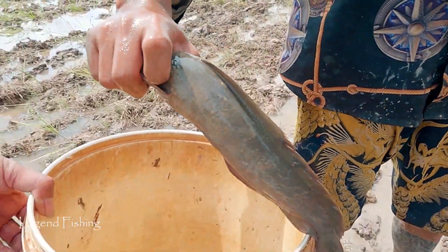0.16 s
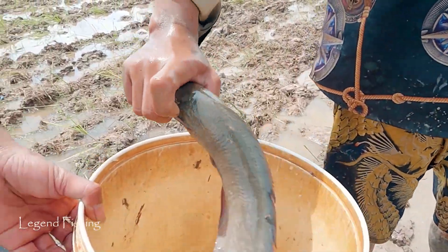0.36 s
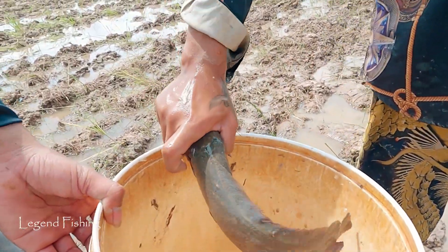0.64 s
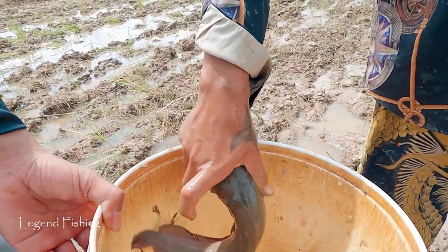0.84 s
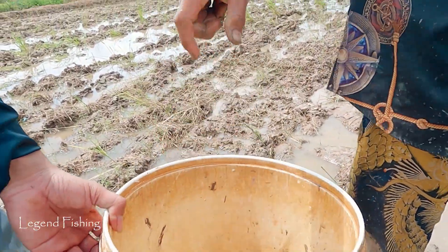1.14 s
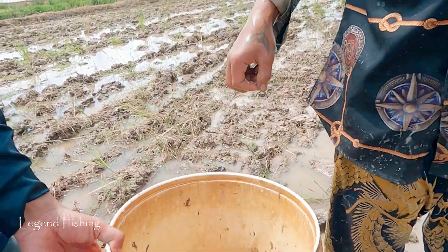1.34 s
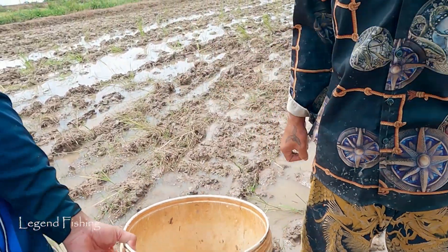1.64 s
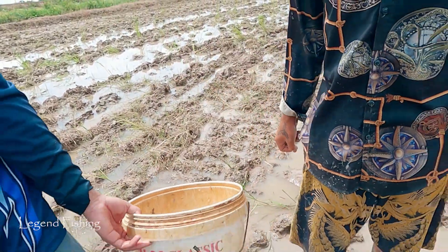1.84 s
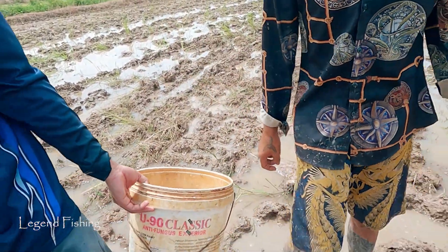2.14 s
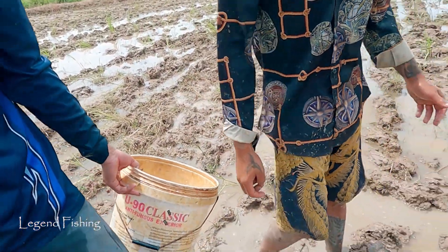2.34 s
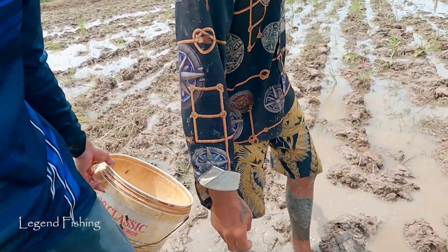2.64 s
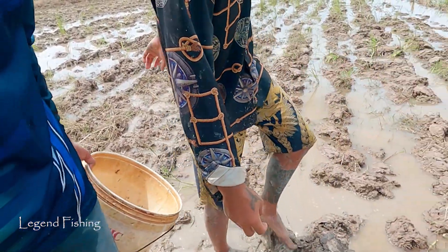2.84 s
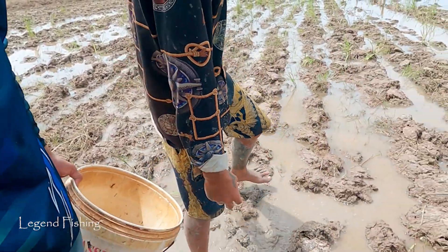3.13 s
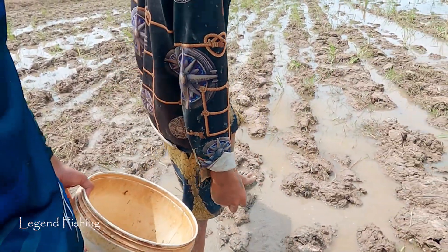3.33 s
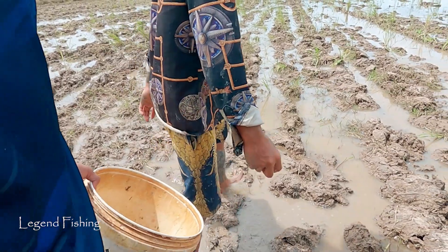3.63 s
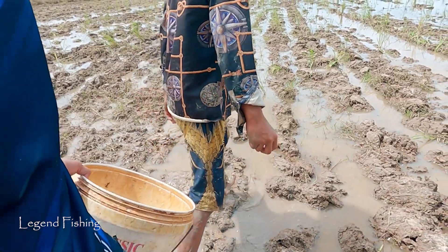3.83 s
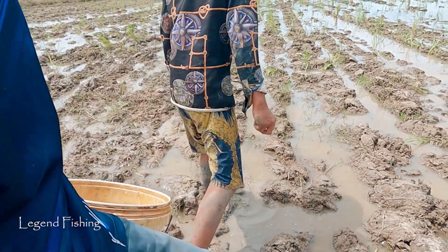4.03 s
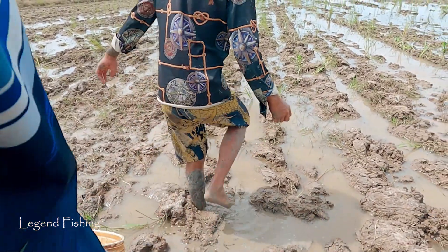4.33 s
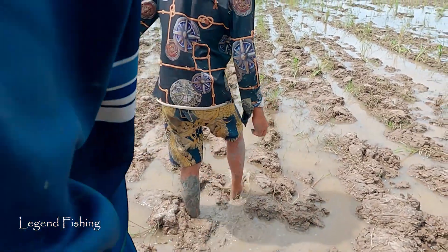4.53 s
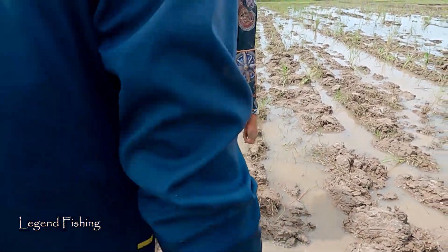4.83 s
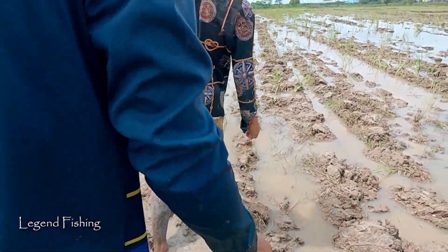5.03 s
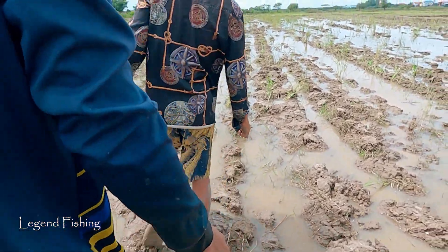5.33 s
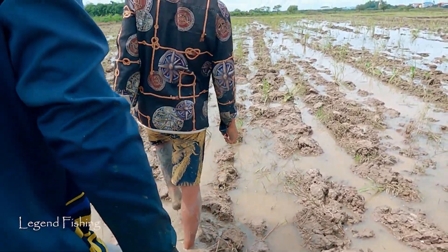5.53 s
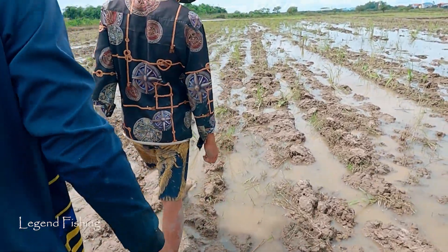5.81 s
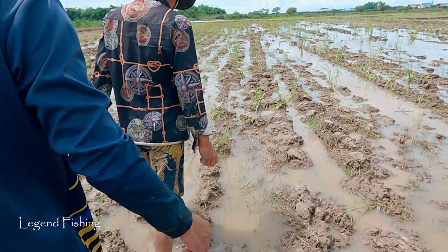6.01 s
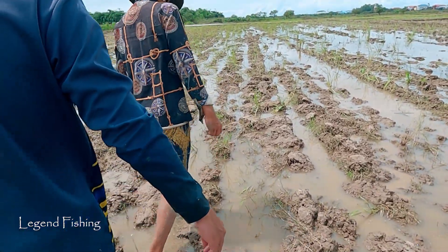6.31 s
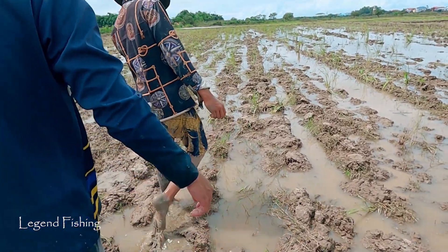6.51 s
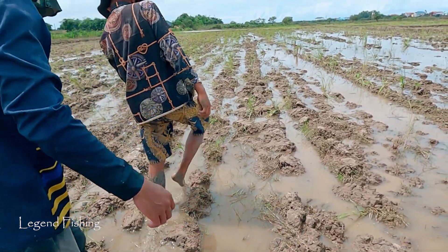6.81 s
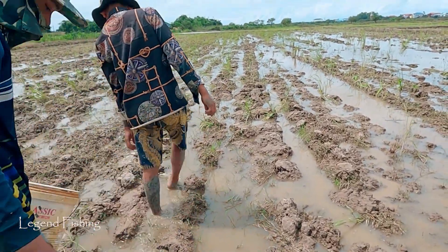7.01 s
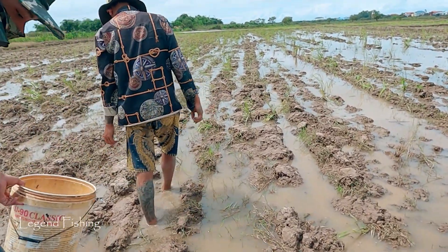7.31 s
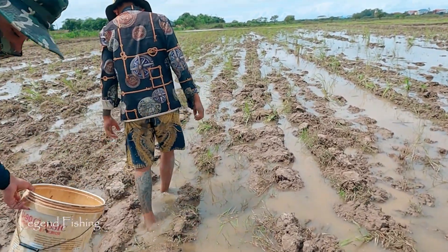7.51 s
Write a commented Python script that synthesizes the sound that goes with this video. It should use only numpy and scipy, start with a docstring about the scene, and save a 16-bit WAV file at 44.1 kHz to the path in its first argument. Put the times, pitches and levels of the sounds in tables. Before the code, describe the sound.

Bare feet squelch and slosh through a flooded muddy field after a fish slaps into a plastic bucket, with wind buffeting and a distant chugging engine.

```python
"""First come a low wind rumble, a slow one-cylinder engine chugging far off and a small plop in the water.
Then people wade close by through a flooded, muddy field, and a fish is dropped into a plastic bucket.
Shaped noise and tiny tones make the water; ringing tones make the plops; noise bursts make the slaps.
Gusts buffet the microphone as low noise, flutter and thuds; regular firings drive the engine's ringing parts.
The stereo picture narrows to mono; a faint side hiss from lossy audio coding remains above 11.8 kHz."""
import sys
import numpy as np
from scipy import signal
from scipy.fft import rfft, irfft
from scipy.io import wavfile
from scipy.ndimage import uniform_filter1d

SR = 44100
rng = np.random.default_rng(int(sys.argv[2]) if len(sys.argv) > 2 else 0)


def inscribe(sig):
    """Save sig as 16-bit PCM at rate SR to the path in sys.argv[1].

    A 1-D sig is mono; a 2-D sig holds one channel per row.
    Samples are clipped to [-1, 1] before scaling.
    """
    pcm = np.round(np.clip(np.atleast_2d(sig).T, -1, 1) * 32767)
    wavfile.write(sys.argv[1], SR, pcm.astype(np.int16))


N = 337806
T = np.arange(N) / SR  # time of every sample [s]

# Tone colour of the far hiss: (frequency [Hz], relative level per Hz [dB])
FIELD_COLOUR = [(180, -13), (300, -2), (424, -18), (744, -7), (969, -7.5), (1640, -12.5), (1910, -18),
                (2530, -25.5), (6590, -20.5), (11200, -31.5), (15600, -84)]
FIELD_DB = -57  # level of the far hiss [dB]

# Engine speed: (time [s], firings per second [1/s])
ENGINE_SPEED = [(0, 11.6), (1.5, 11.74), (5.5, 11.66), (7.7, 11.45)]
# How loud the engine arrives: (time [s], clatter level [dB], thump level [dB])
ENGINE_LEVELS = [(0, -52.5, -36.5), (1, -51.5, -31), (1.6, -55.5, -37), (2.5, -51.5, -30.5),
                 (4, -58.5, -31.5), (5.4, -52, -35.5), (7.66, -60, -36.5)]
# Clattering engine parts: (frequency [Hz], width of the first stages [Hz], relative level [dB])
CLATTER_PARTS = [(4070, 1500, 12), (4960, 2250, 27), (6320, 610, 13.5), (7000, 920, 16)]
# Ringing modes of the exhaust: (frequency [Hz], width of the first stage [Hz], relative level [dB])
EXHAUST_MODES = [(67.6, 15, 4.5), (142.3, 6.6, 0), (173.8, 8.6, -7.5), (222.2, 4.8, -9.5),
                 (263.4, 3.7, -17), (300, 8, -14)]
PING_DB = -6  # valve ping against the clatter [dB]

# Steady air on the microphone: (time [s], rumble level [dB], buffet level [dB])
STEADY_WIND = [(0, -28.5, -38), (1.1, -38.5, -36), (1.5, -35, -39.5), (2.1, -33, -39.5), (2.9, -27, -36),
               (3.6, -34.5, -39), (4.3, -36, -33.5), (5.0, -34.5, -34.5), (5.4, -38.5, -37),
               (6.9, -35, -38), (7.66, -32, -38.5)]
# Tone colour of the low rumble: (frequency [Hz], relative level per Hz [dB])
RUMBLE_COLOUR = [(12, -42), (20, 6), (75, 2), (152, -1.5), (220, -11), (290, -40), (480, -120)]
# Tone colour of the faster buffeting: (frequency [Hz], relative level per Hz [dB])
BUFFET_COLOUR = [(59, -22), (100, 10), (258, 2), (767, -18), (869, -33), (1200, -30), (1560, -27),
                 (2640, -120)]
# Hard gusts: (peak time [s], rise [s], fall [s], rumble level [dB], buffet level [dB],
#              level of the flapping housing [dB], flutter pitch at the peak [Hz])
HARD_GUSTS = [(1.241, 0.052, 0.034, -11, -18.5, -21, 118), (1.269, 0.014, 0.071, -7, -44, -16, 210),
              (1.381, 0.091, 0.044, -15.5, -42, -57, 150), (2.5, 0.0046, 0.025, -13, -8, -30, 180),
              (2.56, 0.077, 0.033, -36, -37, -20.5, 362), (2.68, 0.074, 0.023, -21, -33, -14.5, 326),
              (3.427, 0.022, 0.031, -28, -9, 1.5, 234), (2.615, 0.035, 0.034, -23, -35, -22, 198),
              (3.531, 0.026, 0.062, -18, -37, -60, 200), (4.828, 0.023, 0.042, -28, -27, -21.5, 213),
              (4.885, 0.064, 0.06, -33, -21.5, -20.5, 195), (5.97, 0.075, 0.15, -22, -34.5, -33.5, 151),
              (6.821, 0.058, 0.023, -24, -34.5, -48, 110)]
FLUTTER_SAG = 0.35  # share of the flutter pitch lost where the gust is weak

# Dull knocks on the housing: (time [s], level [dB], final pitch [Hz], time to fade 60 dB [s],
#                             lag of the left port [radians])
HOUSING_THUDS = [(1.366, -24, 130, 0.12, -1), (2.492, 9, 192, 0.028, 1.3), (2.49, -2, 115, 0.086, 3),
                 (2.676, -13, 310, 0.073, 3), (6.812, -18, 110, 0.042, -2.5)]

# The bucket scrapes a leg: (peak time [s], rise [s], fall [s], level [dB])
BUCKET_SCRAPES = [(3.41, 0.0091, .02, -28), (3.423, 0.018, 0.0063, -8)]
# Ringing modes of the plastic wall: (frequency [Hz], width of the first stage [Hz], relative level [dB])
BUCKET_MODES = [(1226, 34, 4.5), (2420, 210, 1), (4500, 760, -1), (696, 570, -1.5)]

# Sharp slaps on water and bucket: (time [s], level [dB], centre [Hz], time to fade 60 dB [s])
SHARP_SLAPS = [(0.8375, -42, 1880, 0.18), (0.8705, -37, 2100, 0.025), (1.029, -27, 7900, 0.09),
               (1.0534, -21.5, 8700, 0.046), (1.198, -25, 2120, 0.013), (1.213, -23, 2150, 0.051),
               (1.225, -5.5, 3130, 0.024), (1.259, -14, 1700, 0.012), (1.47, -31, 1940, 0.062),
               (1.5397, -13.5, 2500, 0.019), (1.568, -40, 3900, .012), (1.664, -26.5, 1900, 0.04),
               (1.696, -36, 2000, 0.027), (1.72, -33.5, 1600, 0.053), (1.751, -30.5, 2040, 0.024),
               (2.489, -24, 2000, 0.012), (2.613, -25.5, 900, 0.022), (2.635, -28, 2500, 0.015),
               (2.667, -27, 1770, 0.0081), (2.672, -25, 2200, 0.0055), (2.679, -34, 1800, 0.0074),
               (2.866, -29.5, 3300, 0.052), (3.426, -17, 4500, .012), (3.51, -27.5, 2640, 0.02),
               (3.517, -43, 1200, 0.027), (4.329, -31, 1400, 0.015), (4.354, -26, 1600, 0.065),
               (4.3963, -15.5, 1400, 0.015), (4.418, -27, 2500, .015), (4.6514, -34, 3480, 0.03),
               (5.17, -32, 2120, 0.02), (6.794, -33, 4200, 0.015), (6.844, -23, 3230, 0.016),
               (7.1207, -28, 5030, 0.027)]

# Air pockets that ring as they close: (time [s], level [dB], rough pitch [Hz], time to fade 60 dB [s])
AIR_POCKETS = [(0.037, -37, 1700, 0.042), (1.199, -21.5, 1040, 0.021), (1.2565, 7.5, 1230, 0.016),
               (1.363, -22.5, 1630, 0.013), (2.163, -36, 853, .06), (2.209, -22.5, 442, 0.019),
               (2.347, -24.5, 1137, 0.041), (2.788, -34, 1610, 0.022), (2.805, -34, 1260, 0.022),
               (2.823, -37, 1930, .025), (2.832, -31, 850, 0.027), (2.852, -29, 842, .03),
               (2.939, -31, 1020, .045), (2.957, -25, 1670, 0.02), (2.964, -26, 630, 0.075),
               (2.996, -23, 960, .04), (3.021, -21, 1500, 0.02), (3.022, -27.5, 835, .04),
               (3.074, -30, 745, 0.034), (3.167, -26.5, 750, 0.041), (3.18, -30, 1215, 0.054),
               (3.232, -32, 1400, 0.022), (3.868, -40, 600, 0.068), (3.919, -29.5, 1204, .06),
               (3.958, -31, 1370, 0.043), (3.968, -33.5, 736, 0.094), (4.005, -36, 996, 0.043),
               (4.183, -27.5, 772, 0.049), (4.186, -33, 1110, .04), (4.211, -30, 1300, .04),
               (4.328, -27, 1160, 0.018), (4.345, -28, 575, .025), (4.354, -31, 1190, 0.053),
               (4.383, -28, 2280, .035), (4.441, -29.5, 2150, 0.029), (4.652, -23, 575, 0.025),
               (5.148, -37, 1930, .042), (5.1685, -18, 880, 0.015), (5.191, -21.5, 810, 0.022),
               (5.197, -21, 501, 0.043), (5.23, -19, 595, .035), (5.26, -31, 900, 0.033),
               (5.27, -35, 2410, 0.032), (5.288, -25, 1000, 0.025), (5.325, -30.5, 2110, .03),
               (5.382, -27, 1760, 0.037), (5.383, -28, 1330, .025), (5.388, -18, 700, 0.029),
               (5.417, -31, 690, .032), (5.485, -27, 1800, 0.037), (5.505, -30, 760, 0.021),
               (5.576, -37, 2950, 0.033), (5.655, -35.5, 1340, .03), (5.924, -13.5, 655, 0.024),
               (5.941, -30, 1500, .025), (5.945, -32, 2170, 0.029), (6.131, -38, 1790, .035),
               (6.147, -31.5, 688, 0.087), (6.291, -31, 780, 0.033), (6.322, -29.5, 700, 0.045),
               (6.368, -33, 2290, 0.034), (6.383, -33, 650, .025), (6.392, -20.5, 850, 0.039),
               (6.422, -36, 2190, .04), (6.466, -37, 820, .025), (6.509, -34, 1560, 0.029),
               (6.562, -32, 684, 0.035), (6.568, -33, 1500, .03), (6.662, -33, 1450, 0.044),
               (6.716, -38, 1180, .044), (6.937, -31, 790, 0.031), (6.978, -23.5, 594, 0.031),
               (7.0, -29, 1250, .055), (7.022, -29, 580, .035), (7.027, -29, 1500, 0.033),
               (7.045, -34, 537, .062), (7.078, -38, 3600, .04), (7.08, -31, 566, 0.045),
               (7.094, -27, 618, 0.052), (7.121, -33, 1210, 0.035), (7.145, -33, 2280, 0.042),
               (7.156, -36, 1290, .04), (7.622, -26, 717, 0.04)]
PLOP_ROUGH, PLOP_RISE = 0.21, 0.038  # share of noise; rise time as a share of the fade time

# Tone colour of the slosh: (frequency [Hz], relative level per Hz [dB])
SLOSH_COLOUR = [(210, -44), (350, -15), (478, -3.5), (610, -1.5), (1130, -1), (1500, -2.5), (5000, -24.5),
                (6500, -62), (11000, -120)]
# Tone colour of the spray: (frequency [Hz], relative level per Hz [dB])
SPRAY_COLOUR = [(880, -10), (1500, 1.5), (2380, -1), (3380, -1), (6380, -7.5), (7250, -10.5),
                (15600, -33.5)]
# Water that keeps moving between steps: (time [s], slosh level [dB], spray level [dB])
CALM_WATER = [(0, -56, -57.5), (.75, -61.5, -59.5), (1.0, -58, -56), (1.3, -62, -115), (2.0, -72, -45),
              (2.73, -68, -55.5), (3.35, -64, -46.5), (3.5, -49, -50), (3.7, -47.5, -53), (5.1, -50, -49),
              (7.66, -52.5, -51)]
# Legs dragged through water: (peak time [s], rise [s], fall [s], slosh level [dB], spray level [dB])
LEG_STRIDES = [(1.06, 0.082, 0.58, -46.5, -47), (1.6, 0.5, 1, -50, -49), (2.33, 0.4, 0.23, -39, -45.5),
               (3.1, 0.54, 0.4, -41, -46.5), (4.2, 0.27, 0.19, -45, -50), (4.55, 1, 0.22, -70, -41.5),
               (5.3, 0.14, 0.96, -60, -46.5), (6.5, 0.37, 0.69, -43.5, -44), (7.03, 0.23, 0.49, -42, -42.5)]
# Short splashes: (peak time [s], fall [s], slosh level [dB], spray level [dB])
SHORT_SPLASHES = [(0.031, 0.054, -38.5, -66), (1.02, 0.049, -52, -38), (1.212, 0.031, -23, -55),
                  (1.227, 0.027, -16, -28), (1.256, 0.022, -17, -20.5), (1.363, 0.095, -40.5, -57),
                  (2.542, 0.11, -37.5, -35.5), (2.672, 0.023, -25, -39), (2.84, 0.063, -39, -53),
                  (3.03, 0.015, -35.5, -54), (3.18, 0.15, -39, -52), (3.426, 0.012, -1, -15),
                  (3.521, 0.048, -34.5, -39.5), (4.008, 0.15, -42, -71), (4.2, 0.15, -40, -46),
                  (4.36, 0.065, -32.5, -34.5), (4.397, 0.03, -28.5, -31), (4.647, 0.059, -57, -39),
                  (5.17, 0.036, -31.5, -61), (5.21, 0.098, -37, -40.5), (5.289, 0.14, -35, -41.5),
                  (5.4, 0.11, -37.5, -63), (5.5, 0.073, -38.5, -41.5), (5.937, 0.14, -37.5, -42),
                  (6.16, 0.11, -41.5, -52), (6.4, 0.31, -39, -49), (6.57, 0.089, -44, -42),
                  (6.68, 0.13, -41, -52), (6.813, 0.039, -40, -27)]
SPLASH_RISE = 0.78  # rise of a splash as a share of its fall
STRIDE_BEND, SPLASH_BEND, GUST_BEND = 1.06, 0.95, 1.49  # roundness of the peaks
BUBBLY, CRACKLY = 2.2, 1.0  # bubbles and mud crackle against the wash

# Stereo picture and coding: (time [s], side gain [dB],
#                             level of the coding hiss and treble above 11.8 kHz [dB])
STEREO_WIDTH = [(0, -2, 6), (1.5, -1.5, 2), (2.45, 2, 0), (2.72, 1.5, -5), (2.95, -13, -9),
                (3.47, -24, -10), (3.6, -48, -10), (5.1, -49, -6), (5.4, -34.5, 4.5), (7.66, -43, 3.5)]
EDGE_HZ = 15700  # upper limit of the sound [Hz]


def amp(db):
    """Turns decibels into a plain gain."""
    return 10 ** (np.asarray(db) / 20)


def evened(x):
    """Brings a sound to an average (rms) level of 1."""
    return x / np.sqrt(np.mean(x ** 2) + 1e-20)


def curves(rows):
    """Each column of a table as a value for every sample."""
    s, *columns = np.transpose(rows)
    return [np.interp(T, s, c) for c in columns]


def add(mix, s, sound):
    """Adds a short sound to the mix, starting at time s."""
    part = mix[round(s * SR):][:len(sound)]
    part += sound[:len(part)]


def colour(x, points):
    """Filters x by the listed levels per frequency, then sets its rms to 1."""
    f, db = np.transpose(points)
    hz = np.fft.rfftfreq(N, 1 / SR)
    gain = amp(np.interp(np.log(hz + 1), np.log(f), db, -120, -120))
    return evened(irfft(rfft(x) * gain, N))


def resonate(x, hz, width):
    """One ringing mode of gain 1; a wider mode dies sooner."""
    r = np.exp(-np.pi * width / SR)
    return 2 * signal.lfilter([1 - r], [1, -r * np.exp(2j * np.pi * hz / SR)], x).real


def lumps(span_s, depth_db):
    """A gain that wanders at random, holding for about span_s."""
    size = max(round(span_s * SR), 1)
    drift = uniform_filter1d(uniform_filter1d(rng.standard_normal(N), size), size)
    return evened(amp(depth_db * evened(drift)))


def grains(lo_hz, hi_hz, cycles, per_s, spread_db):
    """Tiny bubbles: short rising tones of many pitches, a few of them large."""
    size = amp(spread_db * np.minimum(rng.exponential(1, N), 5)) * (rng.random(N) < per_s / SR)
    kind, out = rng.integers(0, 24, N), np.zeros(N)
    for k, hz in enumerate(np.geomspace(lo_hz, hi_hz, 24)):
        turns = np.arange(round(3 * cycles * SR / hz)) * hz / SR
        swing = np.sin(2 * np.pi * turns * (1 + 0.005 * turns))
        tone = swing * np.exp(-turns / cycles * 2) * (1 - np.exp(-turns))
        out += signal.oaconvolve(size * (kind == k), tone * np.sqrt(hz))[:N] * np.sqrt(hz)
    return out


def patchy(depth_db):
    """Noise whose loudness drifts in small patches of time and pitch."""
    frames = N // 64 + 5
    a, b, patches = rng.standard_normal((frames, 129, 3)).T
    patches = uniform_filter1d(uniform_filter1d(patches, size=3, axis=0), size=14, axis=1)
    spectrum = (a + 1j * b) * amp(depth_db * evened(patches))
    return evened(signal.istft(spectrum, nperseg=256, noverlap=192)[1][:N])


def pair(x, side_db, pan_db):
    """Left and right from a shared steady sound plus a far-off stretch of it with opposite signs."""
    side = amp(side_db) * np.roll(x, N // 3)
    return np.array([x + side, x - side]) * amp([[pan_db / 2], [-pan_db / 2]])


def hump(t, s, rise_s, fall_s, bend):
    """A gain of 1 at time s that is 20 dB down rise_s before and fall_s after (2 ms at least)."""
    away = np.where(t < s, (s - t) / max(rise_s, 0.002), (t - s) / max(fall_s, 0.002))
    return amp(-20 * np.minimum(away ** bend, 8))


def swells(steady, *events):
    """Gain of each layer: the steady curve plus the humps of all events, summed in power."""
    coarse = T[::32]  # slow gains need only every 32nd sample
    power = amp(curves(steady))[:, ::32] ** 2
    for rows, bend in events:
        for s, rise_s, fall_s, *db in rows:
            power = power + (amp(db)[:, None] * hump(coarse, s, rise_s, fall_s, bend)) ** 2
    return [np.interp(T, coarse, np.sqrt(p)) for p in power]


def field():
    """The steady far hiss of the open field, made of coloured noise."""
    return amp(FIELD_DB) * pair(colour(rng.standard_normal(N), FIELD_COLOUR), -0.77, -0.6)


def knock(cycle):
    """A quick rise and decay that starts where the share of the engine cycle passes zero."""
    after = np.maximum(cycle, 0)
    return np.exp(-after / 0.098) * (1 - np.exp(-after / 0.018))


def engine():
    """Each firing rattles loose parts in two quick knocks and drives the exhaust; a valve pings twice a cycle."""
    turns = 0.46 + np.cumsum(curves(ENGINE_SPEED)[0]) / SR
    clatter_db, thump_db = curves(ENGINE_LEVELS)
    strength = amp(1.8 * rng.standard_normal(200))  # no two firings are equally strong
    since, firing = (turns + 0.165) % 1, (turns + 0.1547).astype(int)
    hiss = rng.standard_normal(N)

    knocks = knock(since - 0.03) + 1.1 * knock(since - 0.19)
    puff = knocks * strength[firing] * lumps(span_s=0.002, depth_db=1.5)
    parts = np.zeros(N)
    for hz, width, db in CLATTER_PARTS:
        ring = resonate(resonate(resonate(hiss, hz, width), hz, width), hz, 2 * width)
        parts += amp(db) * lumps(span_s=0.012, depth_db=3.0) * evened(ring)
    clatter = evened(puff * pair(parts, -8.0, 0.3))

    shuts = np.diff(np.floor(2 * (turns + 0.37)), prepend=0) > 0
    closing = shuts * amp(1.5 * rng.standard_normal(N))
    uneven = 1 + 0.47 * np.cos(2 * np.pi * (turns + 0.41))  # one valve shuts harder
    strike = evened(closing * uneven) + 0.6 * hiss
    ping = evened(resonate(resonate(resonate(strike, 1890, 170), 1900, 200), 2040, 400))

    bang = (np.diff(firing, prepend=0) > 0) * strength[firing]
    flow = evened(bang) + rng.standard_normal(N)  # gas also rushes between firings
    thump = np.zeros(N)
    for hz, width, db in EXHAUST_MODES:
        thump += amp(db) * evened(resonate(resonate(flow, hz, width), hz, 4 * width))
    return amp(clatter_db) * clatter + amp(clatter_db + PING_DB) * ping + amp(thump_db) * evened(thump)


def wind():
    """Lumpy low turbulence; the faster buffeting differs more between the two ports."""
    swelling = [row[:5] for row in HARD_GUSTS]
    rumble_gain, buffet_gain = swells(STEADY_WIND, (swelling, GUST_BEND))
    rumble = pair(colour(rng.standard_normal(N), RUMBLE_COLOUR), -17.0, -0.4)
    buffet = pair(colour(rng.standard_normal(N), BUFFET_COLOUR), -13.5, -0.1)
    eddies = lumps(span_s=0.0062, depth_db=1.5)
    surges, flurries = lumps(span_s=0.053, depth_db=1.0), lumps(span_s=0.042, depth_db=1.46)
    return eddies * (rumble_gain * surges * rumble + buffet_gain * flurries * buffet)


def gusts():
    """The flapping housing: noise through a wide moving resonance; the two ports share only part of it."""
    out, t = np.zeros((2, N)), T[:round(0.4 * SR)]
    middle = t[-1] / 2
    r = np.exp(-np.pi * 190 / SR)  # resonance width of each stage: 190 Hz
    for s, rise_s, fall_s, _, _, db, hz in HARD_GUSTS:
        shape = hump(t, middle, rise_s, fall_s, GUST_BEND)
        flutter = hz * (1 - FLUTTER_SAG * (1 - np.sqrt(shape)))
        # shift the moving pitch down to zero, smooth twice, then shift back
        turn = np.exp(2j * np.pi * np.cumsum(flutter) / SR)
        slow = rng.standard_normal((2, len(t))) / turn
        slow = signal.lfilter([1 - r], [1, -r], signal.lfilter([1 - r], [1, -r], slow))
        mid, side = (turn * slow / (abs(slow) + 0.33 * abs(slow).mean())).real  # the flap swings nearly evenly
        mid = evened(mid) + 0.28 * (evened(mid) ** 2 - 1)  # outward swings are sharper
        mid = amp(db) * shape * evened(mid)
        side = 0.44 * amp(db) * shape * evened(side)
        add(out[0], s - middle, mid + side)
        add(out[1], s - middle, mid - side)
    return out * amp([[-1.8], [1.8]])


def thuds():
    """A blow starts high and sinks within a few swings; the ports feel it out of step."""
    out, t = np.zeros((2, N)), T[:6000]
    for s, db, hz, t60, trail in HOUSING_THUDS:
        turns = hz * (t + 4.19 * 0.00422 * (1 - np.exp(-t / 0.0041)))
        shape = amp(db - 60 * t / t60) * (1 - np.exp(-t / 0.015))
        for ear, lag in zip(out, (trail, 0)):
            add(ear, s, shape * np.sin(2 * np.pi * turns - lag))
    return out * amp([[-2.5], [3.0]])


def scrape():
    """Dense uneven noise, like crowded clicks, rings the plastic wall of the bucket."""
    stroke = sum(amp(db) * hump(T, s, rise_s, fall_s, SPLASH_BEND) for s, rise_s, fall_s, db in BUCKET_SCRAPES)
    rub = rng.standard_normal(N) * lumps(span_s=0.001, depth_db=2.5)
    wall = np.zeros(N)
    for hz, width, db in BUCKET_MODES:
        wall += amp(db) * evened(resonate(resonate(rub, hz, width), hz, 2 * width))
    return (stroke - stroke.min()) * evened(wall)


def slaps():
    """A crackling burst of noise, strongest around its centre, quick to rise and die."""
    out, t = np.zeros((2, N)), T[:4000]
    noises = rng.standard_normal((len(SHARP_SLAPS), 2, len(t)))
    for (s, db, hz, t60), (a, b) in zip(SHARP_SLAPS, noises):
        shape = amp(db - 60 * t / max(t60, 0.005)) * (1 - np.exp(-t / 0.0008))
        for ear, noise in zip(out, (a + 0.3 * b, a - 0.3 * b)):
            burst = 0.2 * noise + evened(resonate(noise, hz, 0.75 * hz))
            add(ear, s, shape * evened(burst))
    return signal.sosfilt(signal.butter(3, [600, 8500], "bandpass", fs=SR, output="sos"), out)


def plops():
    """Each air pocket is a tone that swells, climbs and dies; mud and spatter roughen it with noise near its pitch."""
    out, t = np.zeros(N), T[:4000]
    noises = rng.standard_normal((len(AIR_POCKETS), len(t)))
    for (s, db, hz, t60), noise in zip(AIR_POCKETS, noises):
        swing = np.sin(2 * np.pi * hz * t * (0.979 + 1.8 * t))
        near = resonate(noise, hz, 0.31 * hz) + 0.5 * resonate(noise, 0.83 * hz, hz)
        spatter = evened(resonate(near, 1.65 * hz, 2 * hz))
        aged = t / max(t60, 0.005)
        shape = amp(-60 * aged) * (1 - np.exp(-aged / PLOP_RISE)) ** 2
        add(out, s, amp(db) * shape / shape.max() * ((1 - PLOP_ROUGH) * swing + PLOP_ROUGH * spatter))
    return out * amp([[-1.2], [1.2]])


def water():
    """Bubbles and mud crackle in a wash make the slosh, fine droplets the spray."""
    splashes = [(s, SPLASH_RISE * fall_s, fall_s, *db) for s, fall_s, *db in SHORT_SPLASHES]
    slosh_gain, spray_gain = swells(CALM_WATER, (LEG_STRIDES, STRIDE_BEND), (splashes, SPLASH_BEND))
    bubbles = evened(grains(450, 4500, cycles=10.0, per_s=1500, spread_db=3.7))
    crackle = evened(grains(600, 4500, cycles=1.5, per_s=700, spread_db=4.0))
    wash = patchy(depth_db=5.0)
    slosh = pair(colour(BUBBLY * bubbles + CRACKLY * crackle + wash, SLOSH_COLOUR), -16.5, -0.5)
    droplets = evened(grains(1800, 15000, cycles=14.0, per_s=1800, spread_db=4.5))
    spray = pair(colour(0.62 * droplets + patchy(depth_db=3.5), SPRAY_COLOUR), -5.5, 0.22)
    clumps = lumps(span_s=0.017, depth_db=2.5)  # drops land in clumps
    return slosh_gain * slosh * lumps(span_s=0.012, depth_db=1.5) + spray_gain * spray * clumps


def scene():
    """All layers together, from the background to the water around the feet."""
    return field() + engine() + wind() + gusts() + thuds() + scrape() + slaps() + plops() + water()


def gain_control(heard):
    """Turns everything down after loud moments, then lets the level creep back."""
    power_db = 10 * np.log10(abs(uniform_filter1d((heard ** 2).mean(0), 500)) + 1e-12)
    fall = T * 60.0  # the held loudness sinks by 60 dB a second
    held_db = np.maximum.accumulate(power_db + fall) - fall
    over_db = np.maximum(held_db + 22.0, 0)  # only what exceeds -22 dB counts
    return heard / amp(0.36 * uniform_filter1d(over_db, 300))


def stereo_picture(left, right):
    """Folds the sound to mono below 11.8 kHz; what lies above has a gain of its own."""
    both = np.array([left + right, left - right]) / 2  # middle and side
    top = signal.oaconvolve(both, signal.firwin(255, 11800, pass_zero=False, fs=SR)[None], "same")
    upper_band = signal.firwin(127, [7800, 11500], pass_zero=False, fs=SR)
    upper = signal.oaconvolve(both[0], upper_band, "same")
    wide, top_gain = amp(curves(STEREO_WIDTH))
    mid = both[0] - top[0] - 0.44 * (1 - wide) * upper + top_gain * top[0]  # in mono the upper treble is duller
    side = wide * (both[1] - top[1]) + top_gain * top[1]  # faint coding hiss above 11.8 kHz is left in the side
    return np.array([mid + side, mid - side])


def record(dry):
    """Microphone roll-off, gain control, the narrowing picture, rounded peaks and a limit to the treble."""
    heard = signal.sosfilt(signal.butter(2, 11000, fs=SR, output="sos"), dry)
    left, right = gain_control(heard)
    # below about 5500 Hz the left port hears two samples later
    left = left + signal.oaconvolve(np.roll(left, 2) - left, signal.firwin(63, 5500, fs=SR), "same")
    rounded = 0.95 * np.tanh(stereo_picture(left, right) / 0.95)
    edge = signal.firwin(1023, EDGE_HZ, window=("kaiser", 9), fs=SR)
    return signal.oaconvolve(rounded, edge[None], "same")


dry = scene()
out = record(dry)
inscribe(out)
```